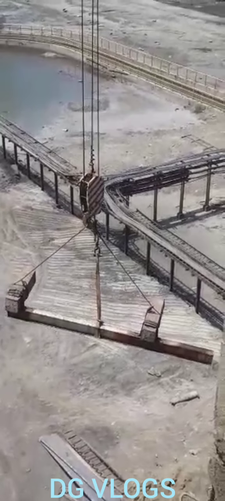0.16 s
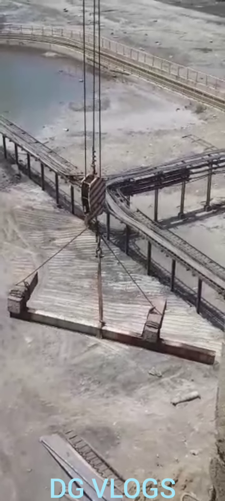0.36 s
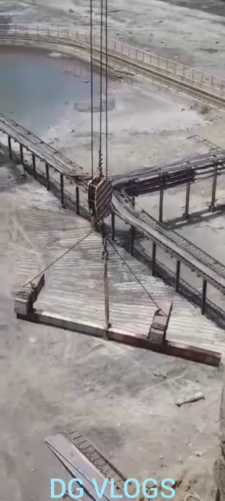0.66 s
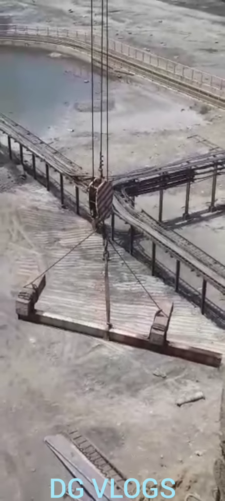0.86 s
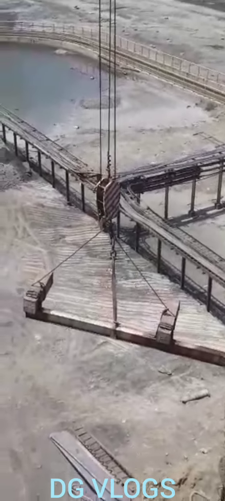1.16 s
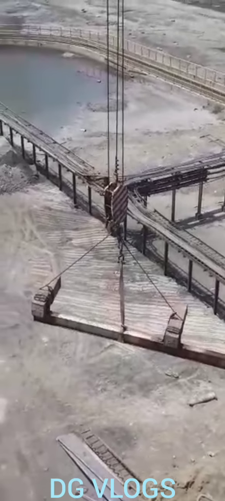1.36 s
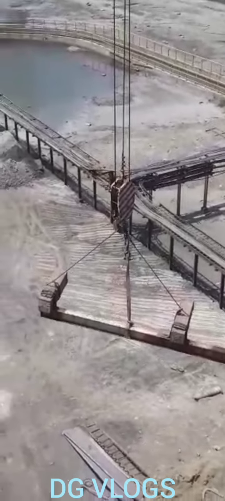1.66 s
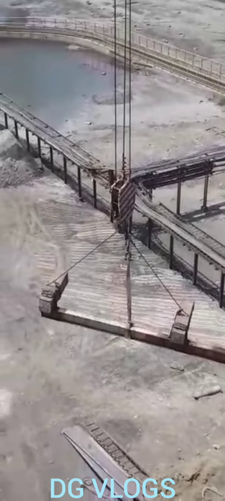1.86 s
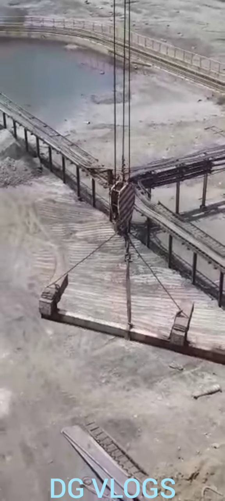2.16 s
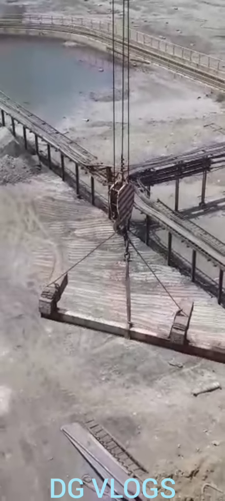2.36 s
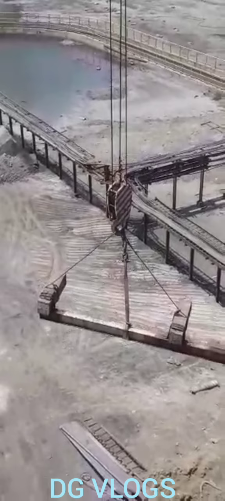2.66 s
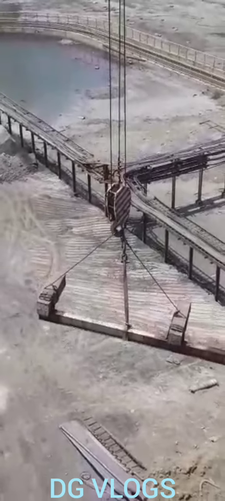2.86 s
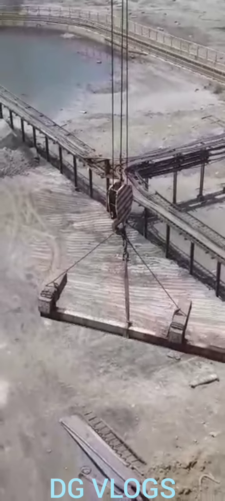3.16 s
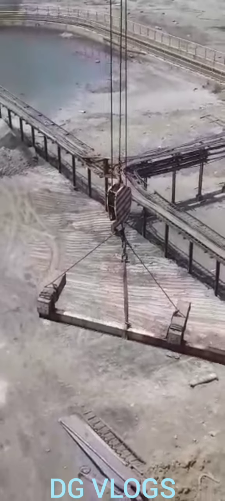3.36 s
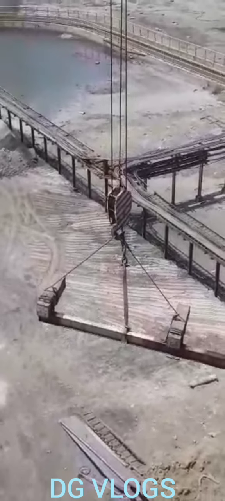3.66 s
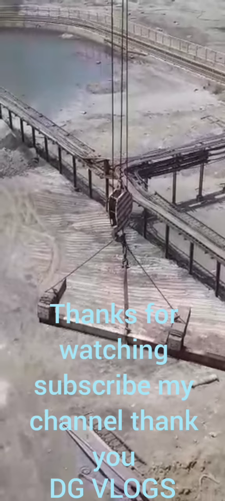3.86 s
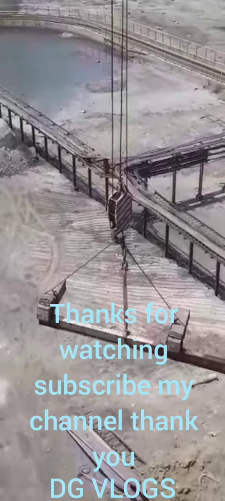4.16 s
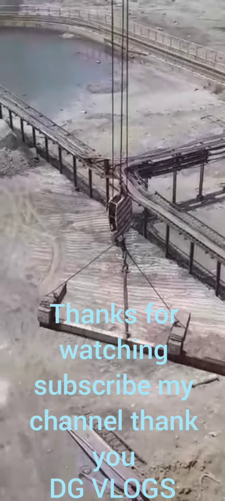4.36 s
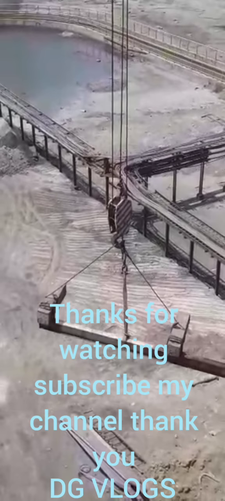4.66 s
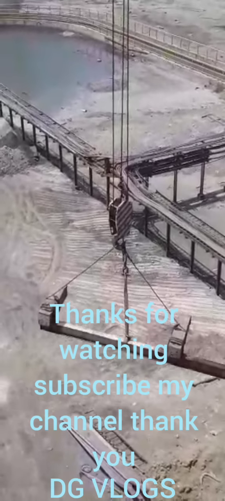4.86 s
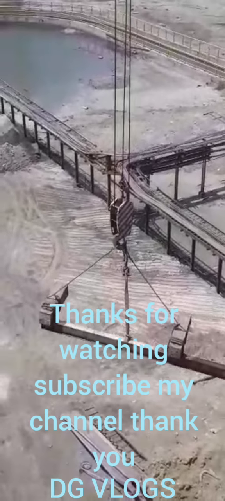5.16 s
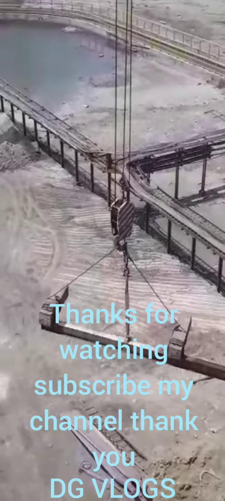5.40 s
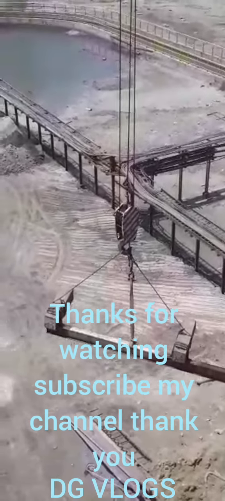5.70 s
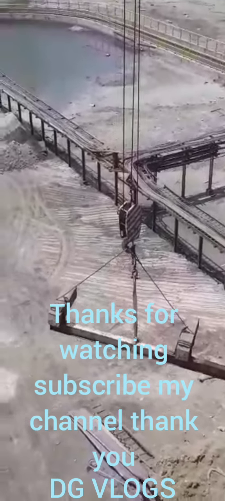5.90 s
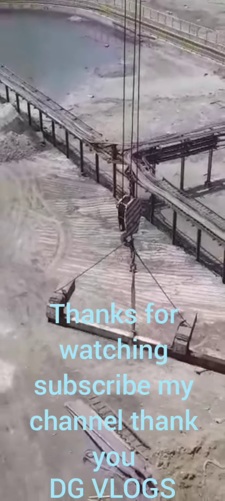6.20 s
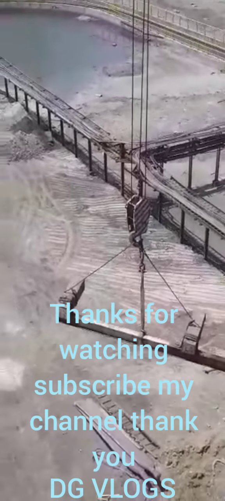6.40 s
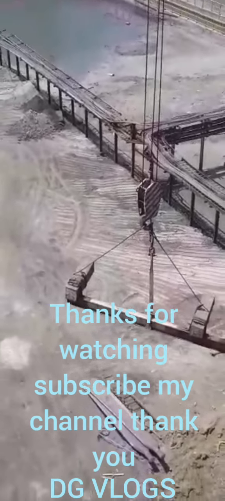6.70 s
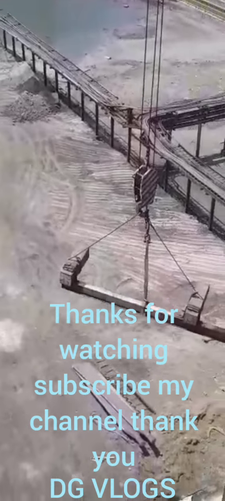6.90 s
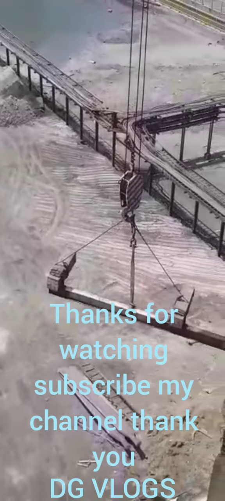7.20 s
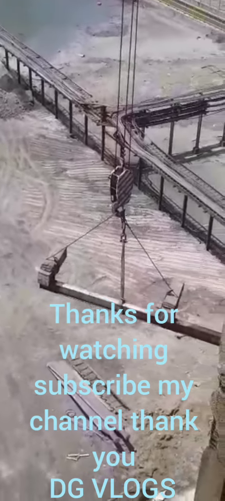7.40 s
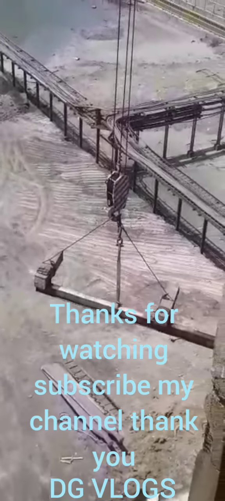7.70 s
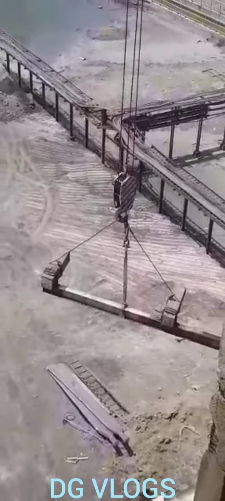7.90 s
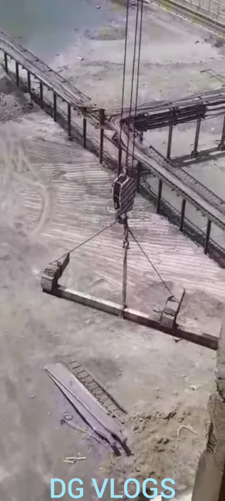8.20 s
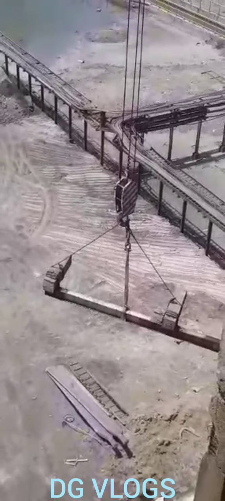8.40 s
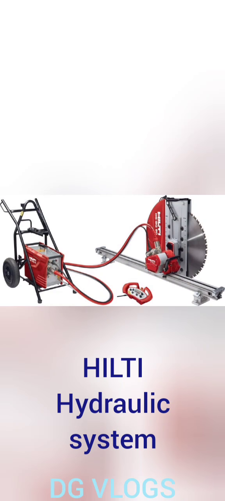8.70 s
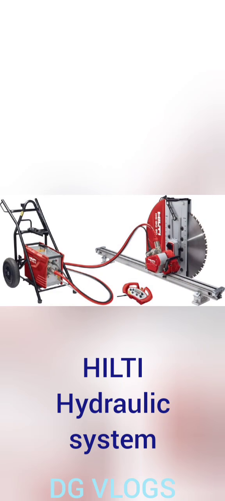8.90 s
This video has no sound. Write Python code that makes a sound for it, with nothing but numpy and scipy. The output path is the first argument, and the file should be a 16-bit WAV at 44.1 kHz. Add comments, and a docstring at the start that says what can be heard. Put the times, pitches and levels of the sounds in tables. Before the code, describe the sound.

A crane's diesel engine is already running at 0 s, close and outdoors, with a low steady hum around 50 to 400 Hz, dense engine harmonics and a rapid throb of about 75 firings per second. It swells by a few decibels over the first two seconds, then stays level and governed. Soft mechanical rush spreads wide above the centred bass. A barely audible tiny tick falls at 0.3 s. The winch clanks at about 1.75, 3.2, 4.7, 6.2 and 7.75 s, starting faint and ending clearly loud; each is a tight, rattling cluster of knocks within under a tenth of a second, with a short mid-pitched metallic ring. Light metal ticks follow at 6.5 s, faintly at 7.4 s, and as a quick triplet near 8.1 s. There is no echo. At 8.5 s everything stops dead, leaving silence.

```python
"""A crane's six-cylinder diesel runs at a governed 1490 rpm, close by, while the winch lowers a load.
Sines locked to the crankshaft and the hums of driven parts sit in noise that pulses with the firings.
The winch clanks about every 1.5 s, louder each time: each clank is a group of decaying noise bursts
with ringing modes. A few light metal ticks, made likewise, come from nearby. Outdoors; it stops dead."""
import sys
import numpy as np
from scipy import signal
from scipy.fft import rfft, irfft
from scipy.io import wavfile
from scipy.ndimage import uniform_filter1d

SR = 44100
rng = np.random.default_rng(int(sys.argv[2]) if len(sys.argv) > 2 else 0)


def bounce(signal):
    """Save signal as a 16-bit WAV file at the path given by the first command-line argument."""
    frames = np.transpose(np.atleast_2d(signal))
    limited = np.clip(frames, -1, 1)
    pcm = np.round(limited * 32767).astype(np.int16)
    wavfile.write(sys.argv[1], SR, pcm)


N = 399096
T = np.arange(N) / SR
BINS = np.fft.rfftfreq(N, 1 / SR)


def engine():
    """Forced vibration: the governed crankshaft sets the orders and firings; all parts swell together."""
    crank_hz, hunt_hz, hunts_per_s = 24.835, .007, 1.2
    start_db, swell_s, engine_db = -3, 1.93, 0.25
    # the governor hunts a little around its set speed
    turns = np.cumsum(crank_hz + hunt_hz * walk(hunts_per_s)) / SR
    mid, side = crank_orders(turns) + undb(-0.75) * driven_parts() + undb(-0.38) * firing_noise(turns)
    # the level rises to its final value, then holds
    level_db = engine_db + start_db * np.clip(1 - T / swell_s, 0, 1)
    return ports(mid, side) * undb(level_db)


# lines of the crankshaft: (multiple of crank speed, relative level/dB)
CRANK_ORDERS = [(2, -42.5), (3, -48.3), (4, -34.5), (5, -34.2), (6, -37.1), (7, -37.9), (8, -30.5),
                (9, -39.2), (10, -49.0), (11, -36.6), (12, -39.1), (13, -45.6), (14, -50.2), (15, -47.6),
                (16, -50.8), (17, -54.9), (18, -47.2), (19, -48.2), (20, -52.8), (21, -49.9), (22, -52.0),
                (23, -54.7), (24, -55.4), (25, -53.6), (26, -57.7), (27, -50.2), (29, -56.0), (30, -57.7),
                (33, -52.8), (34, -45.9), (37, -57.6), (40, -56.3), (44, -50.2), (48, -60.4), (80, -58.9)]


def crank_orders(turns):
    """Harmonic excitation: every line is a whole multiple of the crankshaft rotation."""
    return drone(turns, CRANK_ORDERS, waver=.25)


# pumps, fan and other driven parts: (f/Hz, relative level/dB)
DRIVEN_HUMS = [(63.3, -47.8), (83.4, -33.2), (114.6, -34.2), (133.1, -38.9), (242.3, -38.7), (374.8, -38.5),
               (1500.4, -55.7), (1872.9, -59.7)]


def driven_parts():
    """Tonal excitation with slip: belts and fluid let the hums wander apart from the crank."""
    driven_s = T + .0003 * walk(1.5)
    return drone(driven_s, DRIVEN_HUMS, waver=.22)


def drone(turns, lines, waver, count=6):
    """Superposition: sines swaying in strength and phase; mid and side lie a quarter cycle apart."""
    sway = [walk(2.74) for _ in range(count)]
    out = np.zeros((2, N))
    for multiple, db in lines:
        start, shift = rng.random(2)
        # each line takes two of the shared sways, shifted in time
        swell, drift = (np.roll(sway[i], int(shift * N)) for i in rng.permutation(count)[:2])
        angle = 2 * np.pi * (multiple * turns + start) + waver * drift
        size = np.sqrt(2) * undb(db) * (1 + waver * swell)
        out += size * np.array([np.sin(angle), rng.choice([-1, 1]) * np.cos(angle)])
    return out


# rumble and rush between the lines: (f/Hz, relative level per Hz/dB)
NOISE_SPECTRUM = [(12, -93.5), (28, -78), (50, -61.5), (80, -50.5), (200, -51), (300, -55.5), (450, -61),
                  (800, -66.5), (1500, -73.5), (3100, -80.5), (5500, -86), (7600, -91), (12000, -94.5),
                  (15500, -104)]
# engine covers and panels that colour the noise: (f/Hz, width/Hz, lift/dB)
PANELS = [(837, 50, 2), (1242, 130, 3), (1782, 36, 5.5), (2320, 640, 1.5), (4030, 410, 2.5),
          (6050, 270, 2.5), (8880, 400, 2.5)]


def firing_noise(turns):
    """Amplitude modulation: firings pulse the gas rumble strongly and the mechanical rush weakly."""
    throb, clatter, flutter_db = 1.0, .08, 0.08
    scatter_db, split_hz = 2.5, 680
    # a six-cylinder four-stroke fires three times a turn
    firing = 3 * turns
    index = firing.astype(int)
    cylinder_db = np.array([0.59, -0.91, 1.1, -2, -0.88, -2])
    chance_db = scatter_db * rng.standard_normal(index[-1] + 1)
    strength = undb(cylinder_db[index % len(cylinder_db)] + chance_db[index])
    # each burst falls to about a fifth before the next; smoothing rounds its edge
    decay = np.exp(-(firing % 1) / 0.61)
    burst = unit(uniform_filter1d(strength * decay, size=40))
    rumble = rng.standard_normal((2, N)) * unit(1 + throb * burst)
    flutter = undb(flutter_db * walk(20))
    rush = rng.standard_normal((2, N)) * unit((1 + clatter * burst) * flutter)
    # rumble fills the spectrum below the split, rush above it
    low_share = 1 / (1 + (BINS / split_hz) ** 4)
    both = rfft(rumble) * np.sqrt(low_share) + rfft(rush) * np.sqrt(1 - low_share)
    colour_db = contour(NOISE_SPECTRUM, BINS) + resonances(PANELS, BINS)
    return irfft(both * undb(colour_db), N) * np.sqrt(SR / 2)


def resonances(modes, hz):
    """Resonance: each mode lifts the level in dB along a bell of its own width."""
    return sum(db / (1 + (2 * (hz - f) / width) ** 2) for f, width, db in modes)


# stereo width of the engine: (f/Hz, side minus mid level/dB)
STEREO_WIDTH = [(60, -25), (110, -20), (200, -17.5), (380, -8.5), (700, -8), (1290, 0.5), (2380, 0.5),
                (4400, -0.5), (8120, 1), (15000, -0.5)]
# stereo balance of the engine: (f/Hz, left minus right level/dB)
STEREO_LEAN = [(100, -0.5), (380, -1.5), (700, 1), (1100, -3), (1550, 1), (2400, -5), (3800, 0.5),
               (6000, -1.5), (8300, 0.5), (9700, 3.5), (11500, 3), (15000, 2.5)]


def ports(mid, side):
    """Spatial coherence: two microphone ports share the bass and hear the treble differently."""
    side_gain = undb(contour(STEREO_WIDTH, BINS))
    lean = undb(contour(STEREO_LEAN, BINS) / 2)
    mid, side = rfft(mid), rfft(side) * side_gain
    left, right = (mid + side) * lean, (mid - side) / lean
    return irfft(np.array([left, right]) / np.sqrt(1 + side_gain ** 2), N)


# clanks of the winch, one for each turn: (t/s, relative level/dB, brightness/dB per octave)
CLANKS = [(1.752, -36.5, -0.5), (3.199, -29.5, 0), (4.715, -28, 0.5), (6.213, -26.5, -1), (7.755, -23.5, 0)]
# contacts within every clank, sharp catches and dull knocks in turn:
# (delay t/s, relative level/dB, brightness/dB per octave, relative ring level/dB)
CONTACTS = [(0, -5, 4, -1.5), (.005, -2, -7, 1.5), (.013, -3.5, 4, -3.5), (.028, -3, -1.5, -9),
            (.046, -4.5, 0.5, -5.5), (0.07, -12, -3, -2)]
# ringing of the winch frame: (f/Hz, width/Hz, relative level/dB)
FRAME_MODES = [(865, 22, -1), (1035, 26, 0), (1290, 30, -7), (1540, 26, -3), (1890, 26, -4), (2100, 30, -8),
               (2520, 30, -7), (2690, 26, -4), (3280, 34, -9), (3960, 40, -11), (5520, 60, -16),
               (6500, 60, -17)]
# crash of a contact: (f/Hz, relative level per Hz/dB)
CRASH_SPECTRUM = [(200, -31.5), (650, -6.5), (950, 3.5), (1500, 0), (3000, -10), (6200, -17), (8000, -25),
                  (12000, -31), (15500, -43.5)]


def winch():
    """Repeated impact: once a turn the winch catches, rebounds in one rhythm and shakes its frame."""
    out = np.zeros((2, N))
    for s, db, bright_db in CLANKS:
        for delay_s, contact_db, hard_db, ring_db in CONTACTS:
            scatter_db = 1.0 * rng.standard_normal()
            strength = undb(db + contact_db + scatter_db)
            hit = blow(CRASH_SPECTRUM, FRAME_MODES, bright_db + hard_db, ring_db,
                       t60_s=0.19, damping=.42, crack=0.5, pivot_hz=1520)
            add(out, s + delay_s, strength * hit)
    return out


# light metal ticks: (t/s, relative level/dB, brightness/dB per octave, relative ring level/dB)
TICKS = [(.262, -55, 6, 9), (6.497, -34.5, -3.5, -9), (6.567, -51, -4, -14), (7.373, -47.5, -7.5, -15.5),
         (8.045, -45.5, -15, -12.5), (8.077, -40, -8, -14), (8.107, -42, -12, -16)]
# ringing of the small metal part: (f/Hz, width/Hz, relative level/dB)
TICK_MODES = [(5650, 80, -10), (8750, 60, -7), (11350, 40, 0), (13790, 45, -1)]
# snap of a tick: (f/Hz, relative level per Hz/dB)
SNAP_SPECTRUM = [(1000, -14.5), (3500, -9.5), (5700, 2.5), (7700, -1), (8800, 7), (9900, 0), (13300, 5),
                 (15500, -13)]


def ticks():
    """Impact on small bodies: light metal parts touch nearby and ring in high modes."""
    out = np.zeros((2, N))
    for s, db, bright_db, ring_db in TICKS:
        hit = blow(SNAP_SPECTRUM, TICK_MODES, bright_db, ring_db,
                   t60_s=0.17, damping=0.26, crack=0.99, pivot_hz=8000)
        add(out, s, undb(db) * hit)
    return out


def blow(spectrum, modes, bright_db, ring_db, t60_s, damping, crack, pivot_hz, size=16384):
    """Modal decay: a hit on metal gives a crack, a wash whose treble dies first, and ringing modes."""
    t, hz = np.arange(size) / SR, np.fft.rfftfreq(size, 1 / SR) + 1
    octave = np.log2(hz / pivot_hz)
    noise = rfft(rng.standard_normal((2, size))) * undb(contour(spectrum, hz))
    wash = 0
    # t60_s holds at the pivot; each octave above it decays faster
    for band in np.unique(np.round(octave)):
        band_t60_s = t60_s * 2 ** (-damping * band)
        wash = wash + irfft(noise * (np.round(octave) == band)) * undb(-60 * t / band_t60_s)
    wash = wash / irfft(noise).std() * (1 + crack * np.exp(-t / .003))
    ring = 0
    for f, width, db in modes:
        # every contact lands on another spot and wakes the modes in other proportions
        share = undb(db + 2 * rng.standard_normal())
        phase = 2 * np.pi * (f * t + rng.random((2, 1)))
        ring = ring + share * np.exp(-np.pi * width * t) * np.sin(phase)
    attack = 1 - np.exp(-t / .0003)
    hit = (wash + undb(ring_db) * ring) * attack
    # a harder contact tips the spectrum upwards
    return irfft(rfft(hit) * undb(bright_db * np.clip(octave, -2, 2)))


def add(out, s, sound):
    """Superposition: mix a sound in at time s."""
    start = int(s * SR)
    out[:, start:start + sound.shape[1]] += sound[:, :N - start]


def walk(rate):
    """Low-pass noise: smooth chance of rms 1 that moves about rate times a second."""
    return unit(irfft(rfft(rng.standard_normal(N)) * np.exp(-(BINS / rate) ** 2), N))


def contour(rows, hz):
    """Spectral envelope: interpolate (f/Hz, level/dB) points on a log-frequency axis."""
    points, db = np.transpose(rows)
    return np.interp(np.log(hz + 1), np.log(points), db)


def undb(db):
    """Logarithmic level: decibels to amplitude gain."""
    return 10 ** (np.asarray(db) / 20)


def unit(x):
    """Normalization: scale to rms 1."""
    return x / np.sqrt(np.mean(x ** 2))


def scene():
    """Superposition: engine, winch and ticks add in the open air, without reflections."""
    return engine() + winch() + ticks()


def record(dry):
    """Gating and band limiting: the sound stops abruptly, and a steep low-pass cuts the top."""
    stop_s, fade_s, top_hz = 8.487, .004, 15550
    running = np.clip((stop_s - T) / fade_s, 0, 1)
    low_pass = signal.ellip(10, .1, 80, top_hz, fs=SR, output="sos")
    return signal.sosfilt(low_pass, dry * running)


dry = scene()
out = record(dry)
bounce(out)
```